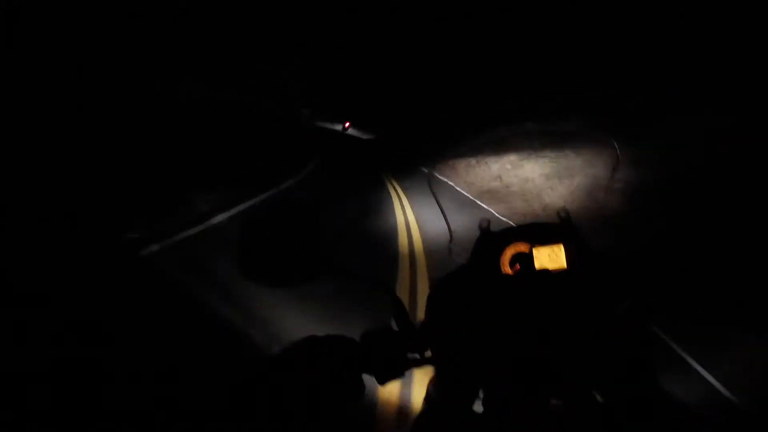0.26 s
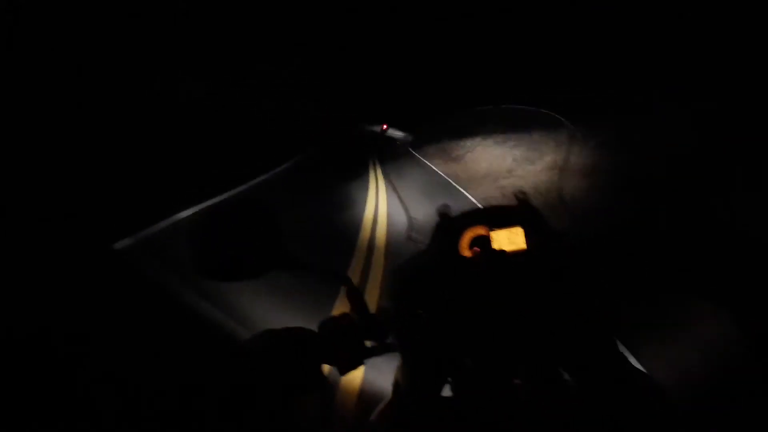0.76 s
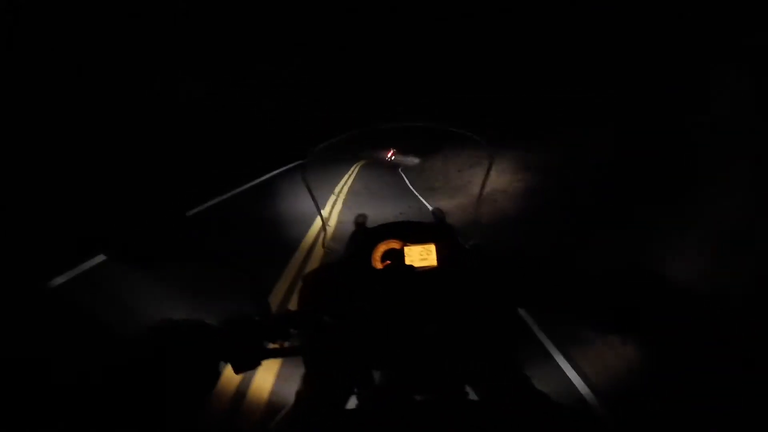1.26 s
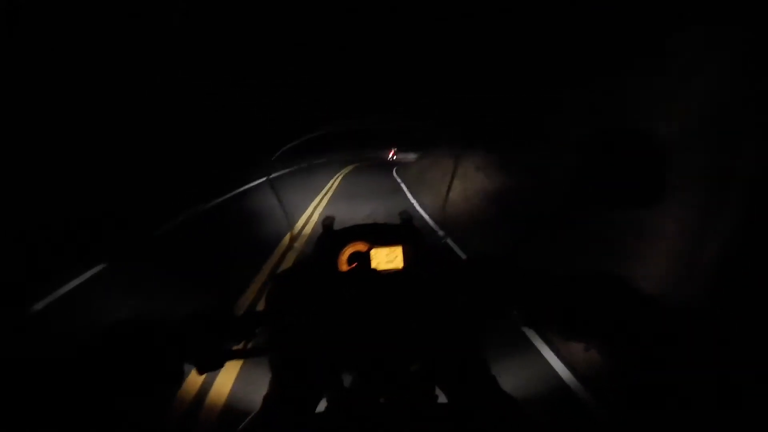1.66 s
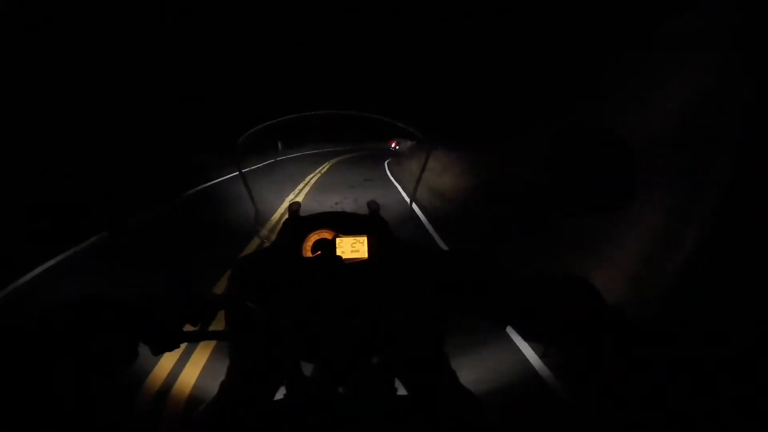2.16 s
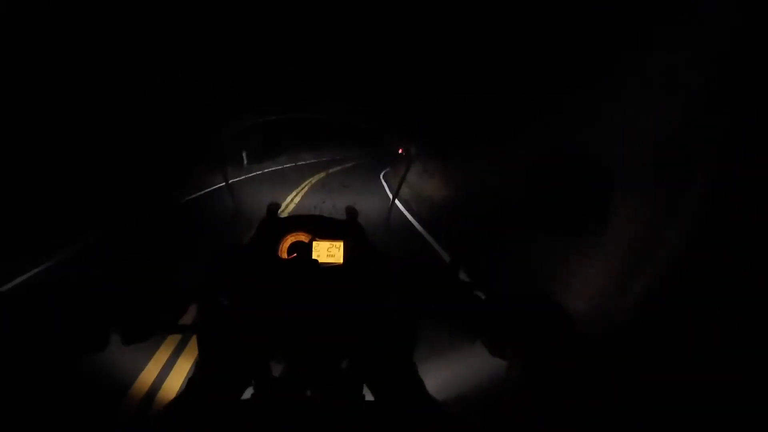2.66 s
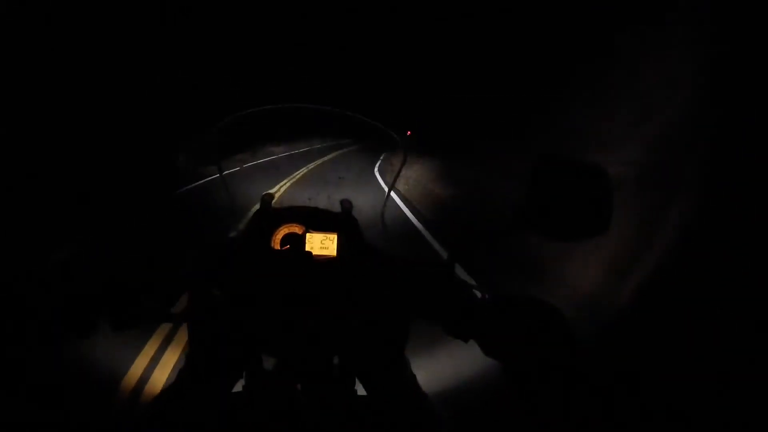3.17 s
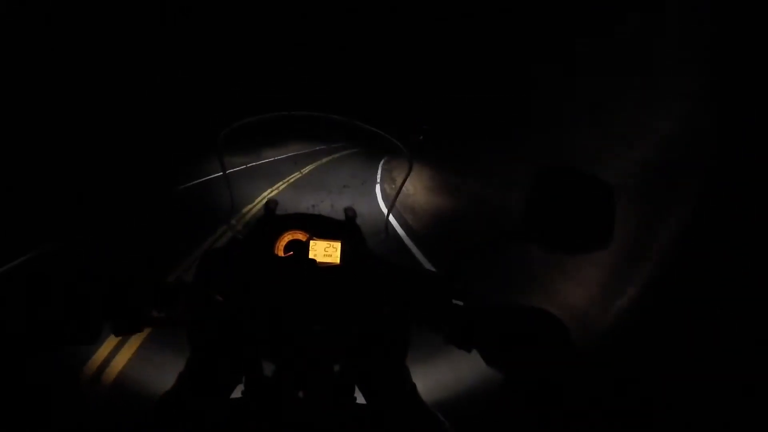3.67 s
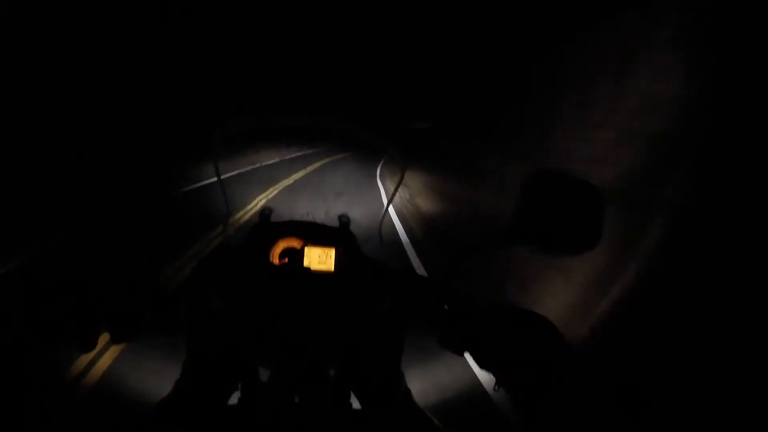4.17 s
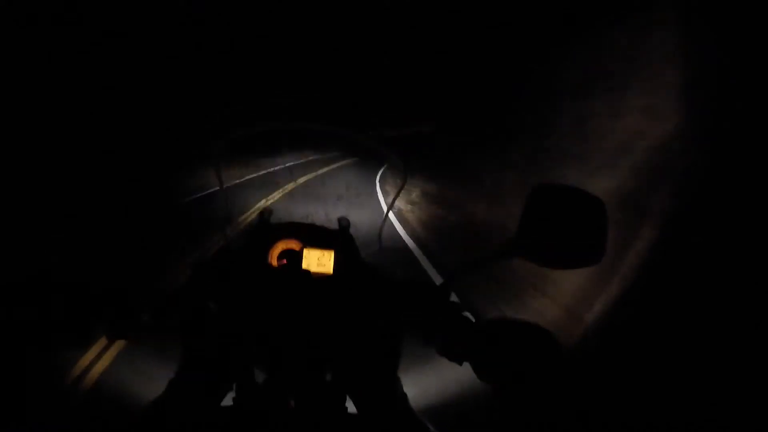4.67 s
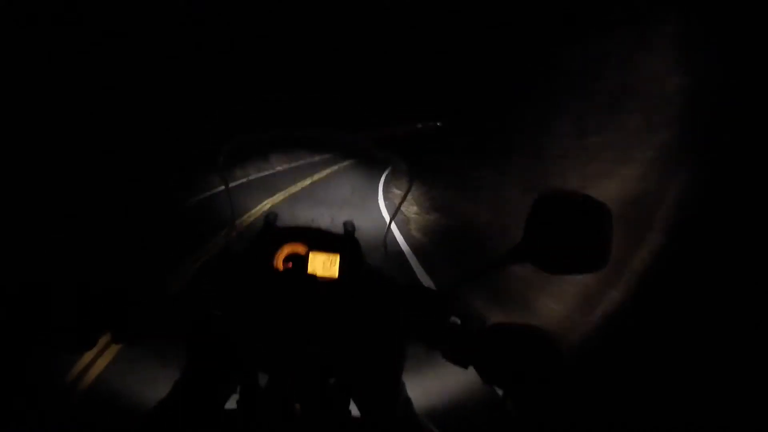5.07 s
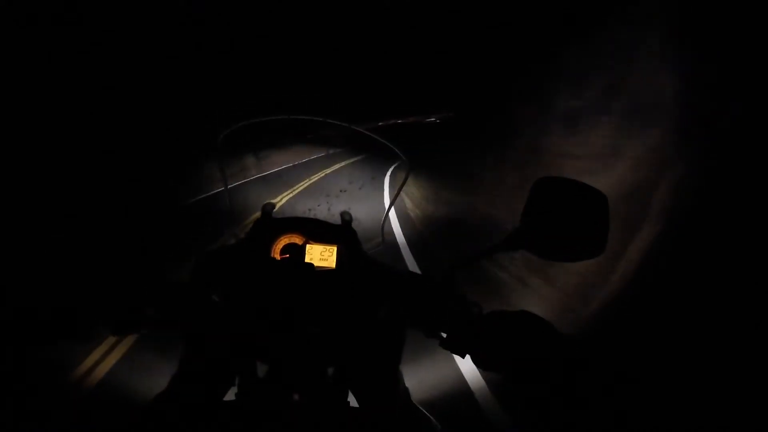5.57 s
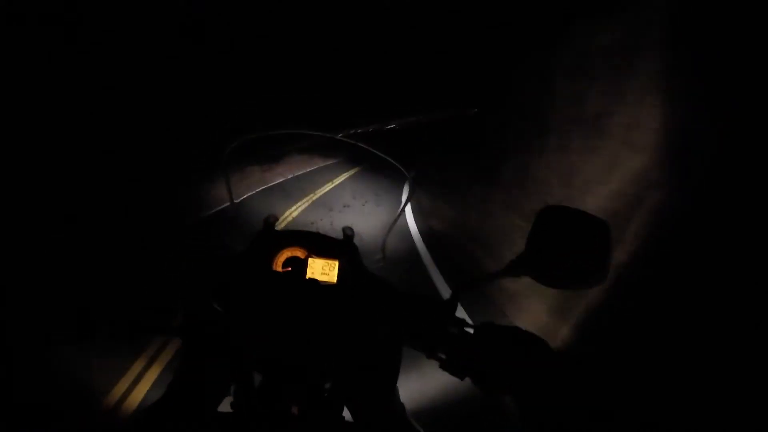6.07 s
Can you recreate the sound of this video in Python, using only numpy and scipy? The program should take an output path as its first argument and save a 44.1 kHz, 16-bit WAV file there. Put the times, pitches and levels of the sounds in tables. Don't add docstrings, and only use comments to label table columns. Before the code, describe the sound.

Heard from on board, a twin-cylinder motorcycle accelerates at full throttle, then shuts off and coasts with lumpy exhaust. It gradually pulls harder until an abrupt cut and slap of air, where the level drops and climbs back. Finally it engine-brakes. Road roar, gear whine and valve hiss continue beneath wind thumps, crackles and small ticks at the microphone.

```python
import sys
import numpy as np
from scipy import signal
from scipy.fft import rfft, irfft
from scipy.io import wavfile
from scipy.ndimage import uniform_filter1d, map_coordinates

SR = 44100
rng = np.random.default_rng(int(sys.argv[2]) if len(sys.argv) > 2 else 0)


def volts_from_decibels(level):
    exponent = np.asarray(level, float) / 20
    return 10 ** exponent


def materialize(psi):
    bounded = np.clip(np.atleast_2d(psi).T, -1, 1)
    quanta = np.round(bounded * 32767).astype(np.int16)
    wavfile.write(sys.argv[1], SR, quanta)


N = 279153

# time in seconds, throttle (1 open, 0 coasting, -0.5 and below full braking),
# exhaust level in dB.
ENGINE = [(0, 1, -14.5), (.4, 1, -12.5), (.75, 0.91, -12), (1.15, 0.98, -19), (1.3, 0.24, -18.5),
          (1.45, 0.28, -18), (1.9, -0.036, -14), (2.25, 0.045, -15.5), (2.55, 0.3, -17), (3.05, 0.45, -18),
          (3.6, 0.61, -16), (4.0, 0.57, -16.5), (4.4, 0.63, -14.5), (4.9, 0.48, -16), (5.5, .3, -20.5),
          (5.7, -0.45, -15.5), (5.85, -0.86, -16), (6.33, -0.089, -20.5)]
# time in seconds, engine cycles per second in Hz.
SPEED = [(0.0, 26.2), (0.6, 28.8), (0.9, 30.7), (1.2, 32.1), (1.39, 29.1), (1.5, 30.9), (2.38, 28.6),
         (2.47, 28.9), (2.92, 28.6), (3.31, 30.3), (3.44, 29.7), (4.02, 31.4), (4.58, 33.5), (5.43, 35.4),
         (5.62, 33.1), (5.75, 34.4), (6.17, 33.5), (6.33, 32.7)]
# time in seconds, lead in
LEAN = [(.15, -.25, -.43), (.45, -.25, -.36), (1.05, -.29, -.27), (1.65, -.43, -.24), (2.25, -.49, -.18),
        (2.55, -.35, -.41), (2.85, -.31, -.4), (3.15, -.36, -.38), (3.75, -.36, -.43), (4.35, -.41, -.4),
        (5.25, -.45, -.47), (5.55, -.61, -.22), (6.2, -.67, -.15)]
# time in seconds, rumble level in dB.
WIND = [(0, -26), (.5, -23.5), (.7, -19.5), (1.1, -19), (1.32, -28), (1.5, -20.5), (1.85, -24.5),
        (2.05, -19), (2.55, -25.5), (2.85, -22.5), (3.15, -25.5), (3.35, -24.5), (4.55, -22.5),
        (4.75, -22.5), (5.3, -25), (5.7, -19.5), (6.12, -22.5), (6.33, -27.5)]

CHANGE_S = 4.6565
SECOND_FIRES = .44


def evened(x):
    return x / np.sqrt(np.mean(x ** 2) + 1e-20)


def curves(rows):
    s, *columns = np.transpose(rows)
    return [np.interp(np.arange(N) / SR, s, column) for column in columns]


def engine_turns():
    return np.cumsum(curves(SPEED)[0]) / SR


def wander(hz):
    knots = rng.standard_normal(400)
    coarse = np.arange(0, N + 64, 64)
    return np.interp(np.arange(N), coarse, map_coordinates(knots, [coarse / SR * hz], order=3))


def colour(x, spectrum):
    at, db = np.transpose(spectrum)
    hz = np.fft.rfftfreq(N, 1 / SR) + 1
    gain_db = np.interp(np.log(hz), np.log(at), db, -120, -120)
    return evened(irfft(rfft(x) * volts_from_decibels(gain_db), N))


def noise(spectrum, patchy_db):
    patches = rng.standard_normal((N // 256 + 8, 513)).T
    patches = uniform_filter1d(patches, size=8, axis=0)
    patches = evened(uniform_filter1d(patches, size=10, axis=1))
    z = signal.stft(rng.standard_normal(N + 1024), nperseg=1024, noverlap=768)[2]
    z = z * volts_from_decibels(patchy_db * patches[:, :z.shape[1]])
    return colour(signal.istft(z, nperseg=1024, noverlap=768)[1][:N], spectrum)


def clatter(spectrum, patchy_db):
    repeating_share, changes_hz = .42, 3
    patterns = rng.standard_normal((40, 512))
    place = [np.arange(N) / SR * changes_hz, engine_turns() % 1 * 512]
    locked = colour(map_coordinates(patterns, place, order=1, mode="grid-wrap"), spectrum)
    free = noise(spectrum, patchy_db)
    return np.sqrt(repeating_share) * locked + np.sqrt(1 - repeating_share) * free


def lift(modes, hz):
    return sum(db / (1 + (2 * (hz - f) / width) ** 2) for f, width, db in modes)


def add(mix, s, sound):
    part = mix[round(s * SR) - len(sound) // 2:][:len(sound)]
    part += sound[:len(part)]


def wind():
    # frequency in Hz, level in dB.
    rumble_spectrum = [(12, -23.5), (25, -3), (40, -1.5), (80, -2.5), (150, -7), (300, -17.5), (450, -30.5),
                       (900, -40.5)]
    rumble = noise(rumble_spectrum, patchy_db=3.0)
    rumble = rumble / np.sqrt(uniform_filter1d(rumble ** 2, size=3500))
    rumble = evened(rumble + 0.074 * (rumble ** 2 - uniform_filter1d(rumble ** 2, size=2000)))
    shake = np.cos(2 * np.pi * (engine_turns() + curves(LEAN)[0] - SECOND_FIRES / 2))
    return volts_from_decibels(curves(WIND)[0] + 0.97 + 3 * shake) * rumble


def small_eddies():
    place, thump, crackle = rng.random((20, 3)).T
    s = .1 + place * (N / SR - .2)
    wind_db = curves(WIND)[0][(s * SR).astype(int)]
    spread_db = 9.5
    return list(zip(s, wind_db + 1 - spread_db * thump, wind_db - 19 - spread_db * crackle))


def gusts():
    # time in seconds, thump in dB, crackle in dB.
    strong = [(0.652, -21, -58), (1.091, -10, -26), (1.179, -27, -24.5), (1.425, -8.5, -24.5),
              (1.46, -26, -27), (1.526, -14.5, -22), (1.667, -14.5, -19.5), (1.719, -10, -23),
              (2.023, -20, -21), (2.143, -43, -26), (2.285, -40, -41), (2.322, -8, -29),
              (2.386, -18, -29.5), (2.757, -9, -23.5), (2.899, -17, -20.5), (3.306, -12.5, -28),
              (3.361, -8, -28.5), (4.629, -10, -30), (4.688, -27, -21), (5.022, -7, -15.5),
              (5.327, -10, -24), (5.46, -8, -28), (5.555, -9.5, -28), (5.735, -17, -40), (5.753, -8.5, -17),
              (5.9, -8, -15.5), (5.956, -7.5, -19.5), (6.037, -9.5, -23.5), (6.127, -32, -28.5),
              (6.149, -8.5, -26)]
    # time in seconds, crackle peak in dB, thump in dB.
    lesser = [(0.385, -25, -28), (0.621, -25.5, -15), (0.691, -24, -16), (0.795, -27, -11),
              (0.968, -31, -19), (1.003, -26, -19), (1.071, -24, -29), (1.127, -23, -33),
              (1.152, -19.5, -19), (1.192, -28, -27), (1.908, -33, -17), (1.929, -24, -26),
              (1.971, -29, -25), (2.067, -22, -20), (2.269, -30.5, -22), (2.673, -25, -24),
              (2.847, -28, -25), (3.526, -30, -23), (4.038, -31, -30), (4.097, -36, -27),
              (4.153, -24.5, -17), (4.223, -29, -12), (4.531, -23, -25), (4.577, -20, -20),
              (4.679, -37, -23), (5.001, -22, -10), (5.674, -24, -14), (5.697, -37, -20), (5.773, -37, -24),
              (5.831, -27, -20), (5.857, -22, -27), (5.872, -19.5, -24), (5.97, -30, -29),
              (6.064, -41, -24)]
    # frequency in Hz, level in dB.
    crackle_spectrum = [(200, 16.5), (400, 7), (800, -1), (1300, -13), (2000, -26), (3000, -33),
                        (5000, -41)]
    rise_s, fall_s = .003, .008
    out, t = np.zeros(N), np.linspace(-.04, .04, 3528)
    tearing = noise(crackle_spectrum, patchy_db=0.2)
    edge = np.diff(tearing, 2).std()
    eddies = strong + [(s + 0.0028, thump_db, peak_db - 3.5) for s, peak_db, thump_db in lesser]
    eddies = eddies + small_eddies()
    puff = evened(np.exp(-abs(t) / np.where(t < 0, rise_s, fall_s)))
    for (s, thump_db, crackle_db), (slow, lopsided) in zip(eddies, rng.random((len(eddies), 2))):
        u = (t - .003) / (.0027 + .002 * slow)
        push = (1 - u ** 2 + u * (lopsided - .9)) * np.exp(-u ** 2 / 2)
        add(out, s, volts_from_decibels(thump_db + 3.5) * push)
        tear = puff * tearing[round(s * SR) - 1764:][:len(t)]
        add(out, s, volts_from_decibels(crackle_db - 10.0) * tear * edge / np.diff(tear, 2).std())
    return out


def rasps():
    # time in seconds, rms level in dB, centre pitch in Hz, half length in seconds.
    whistles = [(1.091, -29, 1380, 0.0061), (1.155, -33, 1100, .006), (1.181, -32, 800, 0.0066),
                (1.427, -37, 1400, 0.0045), (1.655, -36, 800, .005), (2.022, -29, 900, .007),
                (2.085, -36, 900, 0.0074), (2.209, -38, 1000, 0.0055), (2.899, -33, 1240, 0.0046),
                (4.683, -31, 1100, 0.0066), (5.02, -26, 890, 0.0044), (5.747, -31.5, 800, .009),
                (5.884, -33.5, 1000, .009), (5.901, -30, 1350, 0.0035), (6.126, -34, 900, .004)]
    width_octaves = .45
    out, t = np.zeros(N), np.linspace(-.04, .04, 3528)
    hz = np.fft.rfftfreq(3528, 1 / SR) + 1
    for (s, rms_db, centre_hz, half), air in zip(whistles, rng.standard_normal((len(whistles), 3528))):
        swell = np.exp(-(t / half) ** 2 / 2)
        octaves = np.log2(hz / centre_hz)
        band = irfft(rfft(air) * np.exp(-(octaves / width_octaves) ** 2 / 2)) * swell
        add(out, s, volts_from_decibels(rms_db) * band * swell.std() / band.std())
    return out


def ticks():
    # time in seconds, peak level in dB, bluntness in samples.
    sharp_ticks = [(1.084, -29, 14), (1.089, -31, 12), (1.095, -30, 14), (1.127, -33, 16), (1.155, -30, 18),
                   (1.178, -29, 16), (1.424, -33, 13), (1.429, -31, 13), (1.458, -34, 18), (1.526, -33, 14),
                   (1.665, -38, 14), (2.142, -34, 16), (2.284, -35, 16), (2.321, -39, 16), (2.385, -29, 16),
                   (2.899, -25, 13), (3.833, -28, 16), (4.282, -31, 18), (4.578, -29, 9), (5.02, -22, 8),
                   (5.327, -30, 20), (5.554, -29, 12), (5.735, -26, 16), (5.742, -31, 14), (5.753, -28.5, 7.7),
                   (5.862, -33, 10), (5.886, -28, 14), (5.899, -23, 8), (5.957, -33, 9), (6.036, -35, 17),
                   (6.061, -35, 16), (6.097, -36, 3.5), (6.101, -27, 15), (6.127, -31, 10), (6.148, -31, 16),
                   (6.232, -40, 6), (6.24, -31, 16)]
    fade_s = .0006
    out, t = np.zeros(N), np.arange(-220, 221) / SR
    for (s, peak_db, blunt), grain in zip(sharp_ticks, rng.standard_normal((len(sharp_ticks), 441))):
        snap = np.gradient(np.exp(-(t * SR / (.62 * blunt)) ** 2 / 2))
        scrape = grain * np.exp(-t / fade_s) * (t > 0)
        scrape = signal.convolve(scrape, np.hanning(round(3 * blunt) + 1), "same")
        tick = np.sign(grain[0]) * snap / snap.max() + .6 * scrape / abs(scrape).max()
        add(out, s, volts_from_decibels(peak_db) * tick)
    return out


def scene_change():
    out, t = np.zeros(N), np.linspace(-.04, .04, 3528)
    trough = np.exp(-abs(t) / 0.0095) * (t < 0)
    add(out, CHANGE_S, -volts_from_decibels(-8.5) * uniform_filter1d(trough, size=3))
    slap_s, rise_s, suction, fall_s = 4.6935, .004, .5, .012
    slap = np.where(t < 0, np.exp(t / rise_s), -suction * np.exp(-(t / fall_s) ** 2))
    slap = uniform_filter1d(uniform_filter1d(slap, size=60), size=60)
    add(out, slap_s, volts_from_decibels(5) * slap)
    return out


def machinery():
    # time in seconds, clatter level in dB.
    work = [(0, -42.5), (.23, -40), (.85, -39.5), (1.1, -44), (1.22, -44.5), (1.33, -47.5), (1.6, -46.5),
            (2.2, -45.5), (2.83, -46), (3.47, -42.5), (4.1, -41), (4.5, -38.5), (4.65, -40.5), (5.14, -41),
            (5.5, -43.5), (5.98, -46), (6.12, -51), (6.33, -49.5)]
    # frequency in Hz, level in dB.
    hiss_spectrum = [(3800, -20.5), (4600, -11), (5100, -5), (5700, -1), (6200, -4), (6550, -2),
                     (7000, -12), (8500, -19.5), (10000, -27.5), (11800, -38.5), (12900, -54.5)]
    wash_spectrum = [(1100, -34.5), (1500, 2.5), (1800, -1.5), (2100, 2), (2500, -0.5), (2900, -1),
                     (3300, -1.5), (3700, -2.5), (4200, -7), (5000, -28)]
    roar_spectrum = [(250, -14.5), (380, 3.5), (500, 2), (750, -3.5), (900, -7.5), (1100, -11.5),
                     (1400, -10), (1800, -21.5), (2500, -48)]
    # frequency in Hz, width in Hz, lift in dB.
    housing = [(1092, 55, 7.5), (1480, 76, 1), (2486, 130, 6), (3012, 50, 6), (3560, 46, 6.5),
               (3757, 48, 8.5)]
    turns, throttle = engine_turns(), np.clip(curves(ENGINE)[0], 0, 1)
    hiss_db = curves(work)[0]
    effort_db = hiss_db + 45
    breeze_db = curves(WIND)[0] + 23
    wash_db = -53 + 0.74 * effort_db + 4 * throttle
    roar_db = -41.5 + 0.73 * effort_db + 0.68 * breeze_db + 1.5 * throttle
    throb = np.cos(2 * np.pi * turns - 2.5) + 0.9 * np.cos(6 * np.pi * turns)
    hiss = volts_from_decibels(hiss_db - 1.5 + .5 * throb + .5 * wander(hz=30.2)) * noise(hiss_spectrum, patchy_db=0.5)
    wash = volts_from_decibels(wash_db + 0.23 * throb + .5 * wander(hz=30.16)) * clatter(wash_spectrum, patchy_db=1.0)
    roar = volts_from_decibels(roar_db + 1.0 * throb + 0.5 * wander(hz=40.44)) * clatter(roar_spectrum, patchy_db=-0.5)
    case = volts_from_decibels(lift(housing, np.fft.rfftfreq(N, 1 / SR)))
    return irfft(rfft(hiss + wash + roar) * case, N)


def gear_whine():
    # multiple of the engine cycle, level in dB when coasting, level in dB under load.
    teeth = [(32.9, -12, 2), (35.77, 8, -1.5), (46, -8, -13.5), (50.6, -10.5, 1), (52.1, -7.5, -4.5),
             (53.5, -6.5, -2), (55.6, -19, -0.5), (65.3, -15.5, 1.5), (67.3, 1, -3), (68.4, 6.5, 3),
             (69.1, -4.5, 1), (69.7, 0, -6), (71.6, -2.5, -0.5), (88.7, -11.5, -15)]
    # time in seconds, whine level in dB.
    grip = [(0, -51.5), (.95, -53), (1.1, -69), (1.5, -62.5), (2.3, -61), (2.7, -65.5), (3.3, -60),
            (4.0, -62.5), (4.6, -63), (4.9, -57.5), (5.3, -59.5), (5.45, -66.5)]
    turns, throttle = engine_turns(), np.clip(curves(ENGINE)[0], 0, 1)
    out = np.zeros(N)
    for k, coast_db, load_db in teeth:
        level_db = coast_db + throttle * (load_db - coast_db) + 2.2 * wander(hz=12)
        jitter = (1.3 + 1.2 * throttle) * wander(hz=20)
        out += volts_from_decibels(level_db) * np.cos(2 * np.pi * k * turns + jitter)
    return volts_from_decibels(curves(grip)[0]) * out


def exhaust():
    # multiple of the engine cycle; level in dB when braking on the engine, coasting,
    # a third open, two thirds open and wide open; dB per Hz of speed at part and at full throttle.
    harmonics = [(1, -27.5, -36.5, -26, -26.5, -25, -1.5, 2.5),
                 (2, -17.5, -18.5, -17, -13, -15.5, 0.0, -0.4), (3, -17.5, -14.5, -18.5, -20, -29, -0.1, 1),
                 (4, -22, -28.5, -27.5, -25.5, -40, 0.3, -2), (5, -41, -25.5, -32, -41, -18.5, 2, 3),
                 (6, -26, -24.5, -27.5, -22.5, -27.5, -0.6, 0.63),
                 (7, -40.5, -39.5, -41.5, -31.5, -39, 1.2, 6), (8, -24, -32, -30.5, -33.5, -25, -0.44, 5),
                 (9, -22, -34, -38, -32.5, -30.5, -3, 2.5), (10, -47, -33.5, -32.5, -26.5, -27, -1.0, 0.27),
                 (11, -42.5, -40, -45, -40.5, -34.0, 1, -0.8), (12, -50, -50, -46.5, -42.5, -41.5, -1, -2),
                 (13, -54, -60, -53.5, -43.5, -45.5, -2.5, -3.5), (14, -51, -57, -47.5, -58, -45, -3, -0.5),
                 (15, -55, -60, -49, -50, -56.5, -1, -3.5), (16, -53, -60, -53.5, -47, -60, 0.9, -4),
                 (18, -45.5, -58, -42, -48, -42, 0, 1.5), (19, -58, -55.5, -58.5, -63, -41.5, -0.3, 2),
                 (20, -47, -56.5, -61.5, -53, -44.5, -3.5, 1), (22, -68, -63.5, -52, -47.5, -44, 1, 3.5),
                 (24, -66.5, -62, -66, -59, -44, -3, 1.5)]
    wrist = [-.5, 0, .35, .6, 1]
    # frequency in Hz, width in Hz, lift in dB.
    pipe = [(159.2, 22.3, 4.5), (247.4, 54, 4.5), (66, 12, -2.5), (304, 25, -0.5), (389, 140, -4.5)]
    second_size, mean_cycle_hz = .5, 31
    smear_turns = -.015
    (hz,), (throttle, level_db) = curves(SPEED), curves(ENGINE)
    lead, lean = curves(LEAN)
    turns, power, tone = engine_turns(), np.zeros(N), np.zeros(N)
    for order, *balance_db, part_db_per_hz, full_db_per_hz in harmonics:
        k = round(order)
        db_per_hz = np.interp(throttle, wrist[-2:], [part_db_per_hz, full_db_per_hz])
        size_db = np.interp(throttle, wrist, balance_db) + db_per_hz * (hz - mean_cycle_hz)
        size = volts_from_decibels(size_db + lift(pipe, k * hz))
        pair = np.angle(1 + second_size * np.exp(-2j * np.pi * k * SECOND_FIRES))
        drift, sway = .2 * wander(hz=3), volts_from_decibels(.8 * wander(hz=4))
        phase = k * (turns + lead) + smear_turns * k ** 2 + lean
        tone += size * sway * np.cos(2 * np.pi * phase + pair + drift)
        power += size ** 2 / 2
    return volts_from_decibels(level_db) * tone / np.sqrt(power)


def scene():
    since, settle_s = np.arange(N) / SR - CHANGE_S, .016
    settle = volts_from_decibels(-12 * np.exp(-((since - settle_s / 2) / settle_s) ** 2))
    air = settle * wind() + gusts() + rasps() + ticks() + scene_change()
    return (air + machinery() + gear_whine() + settle * exhaust())[None]


def roll_off(x):
    return signal.sosfilt(signal.butter(12, 12800, fs=SR, output="sos"), x)


def record(dry):
    since = np.arange(N) / SR - CHANGE_S
    recover_s = 0.89
    duck_db = -10 * np.clip(1 - since / recover_s, 0, 1) * np.clip(since / .002, 0, 1)
    start = np.minimum(np.arange(N) / 60, 1)
    soft = .95 * np.tanh(dry * start * volts_from_decibels(duck_db) / .95)
    return roll_off(soft)


dry = scene()
out = record(dry)
materialize(out)
```